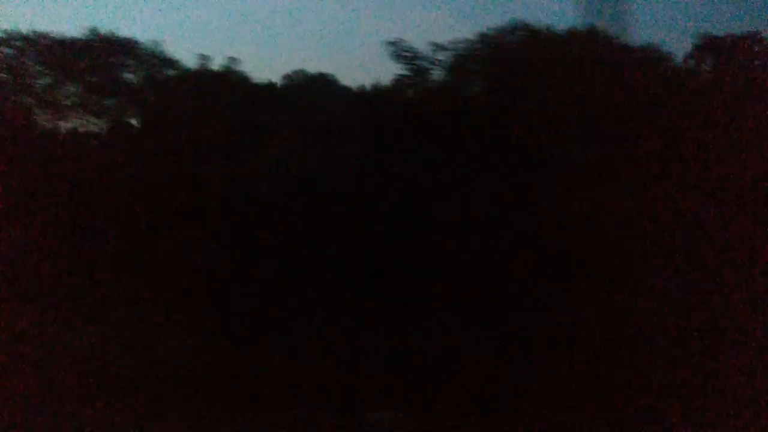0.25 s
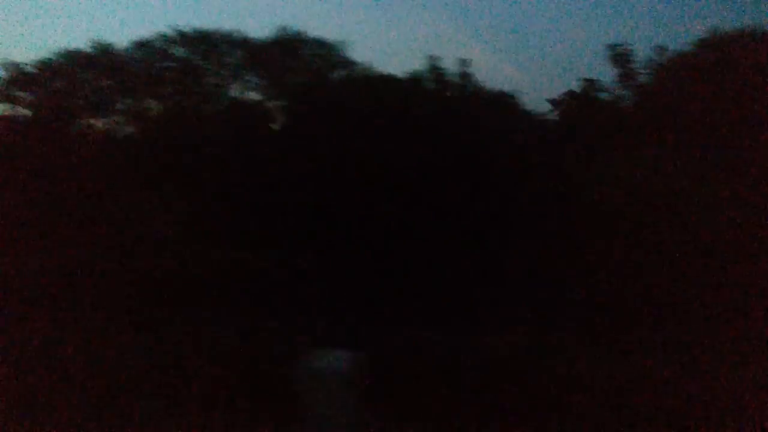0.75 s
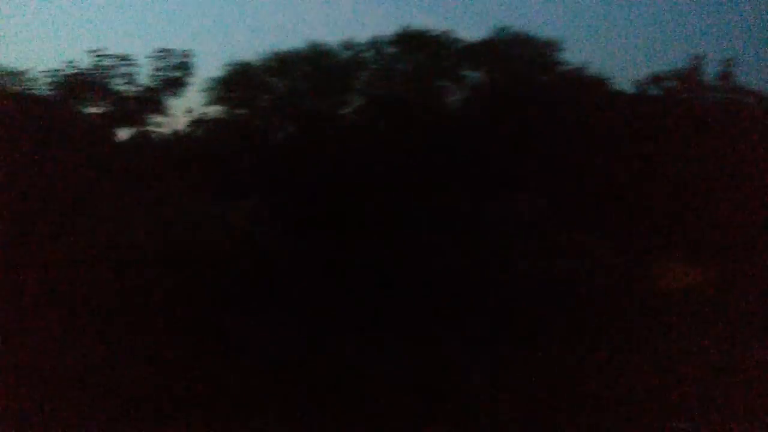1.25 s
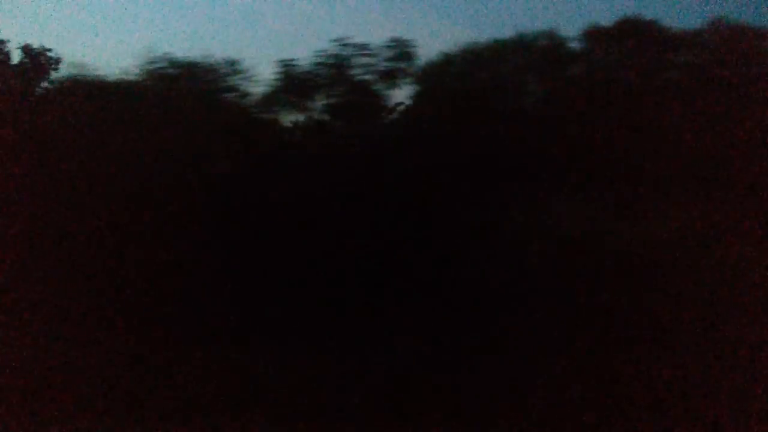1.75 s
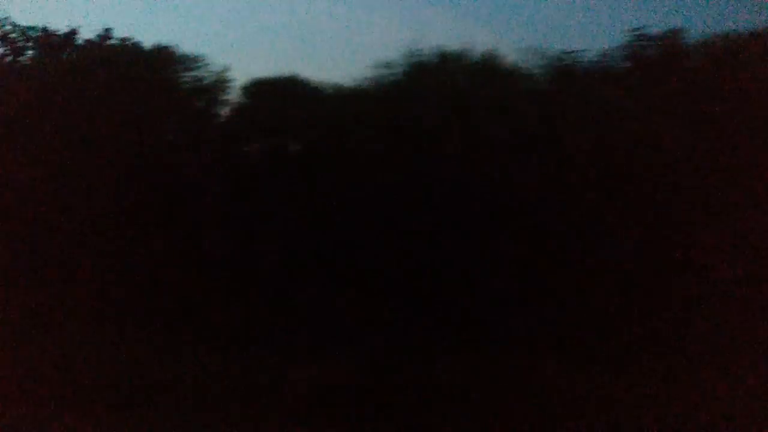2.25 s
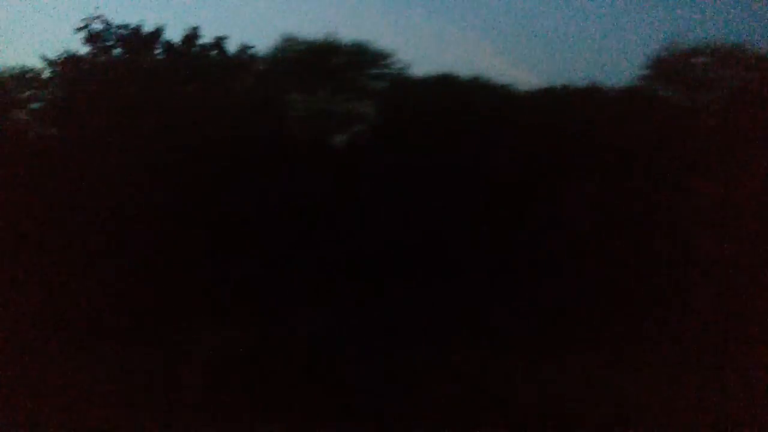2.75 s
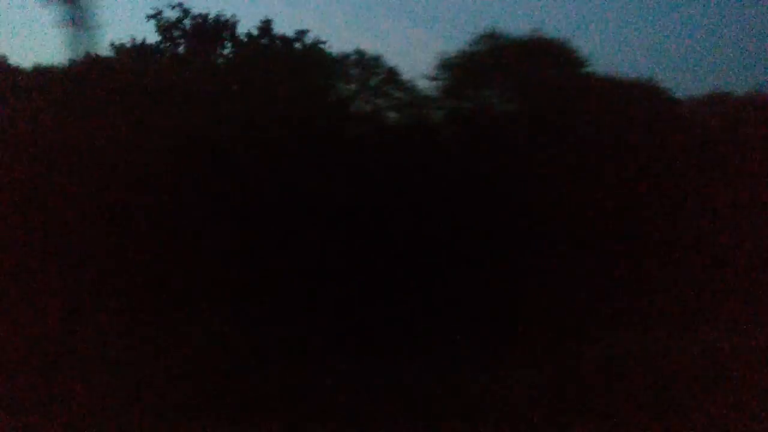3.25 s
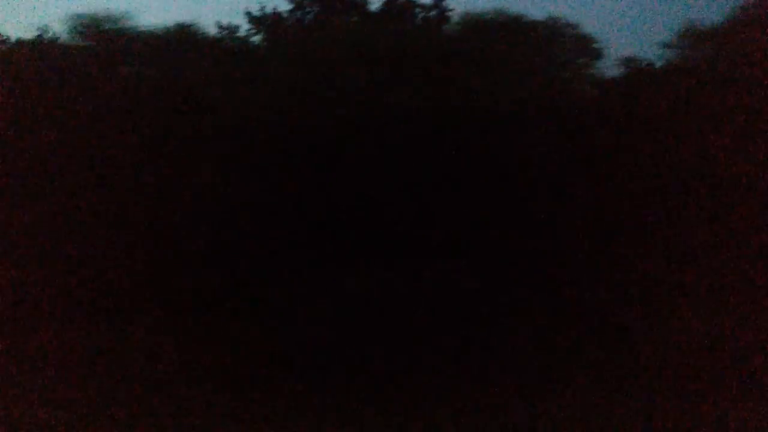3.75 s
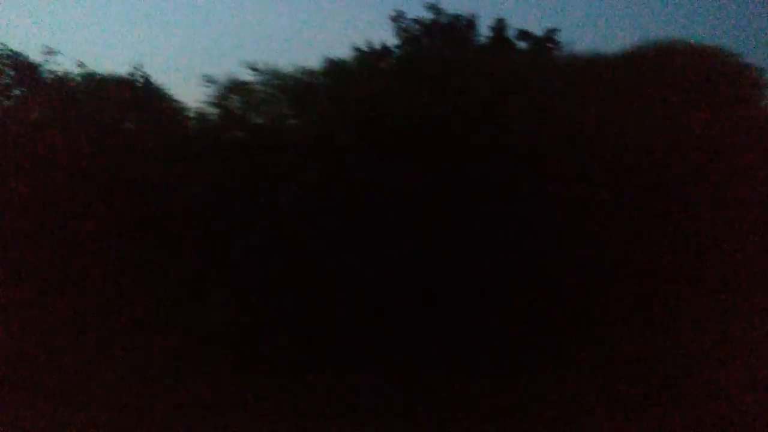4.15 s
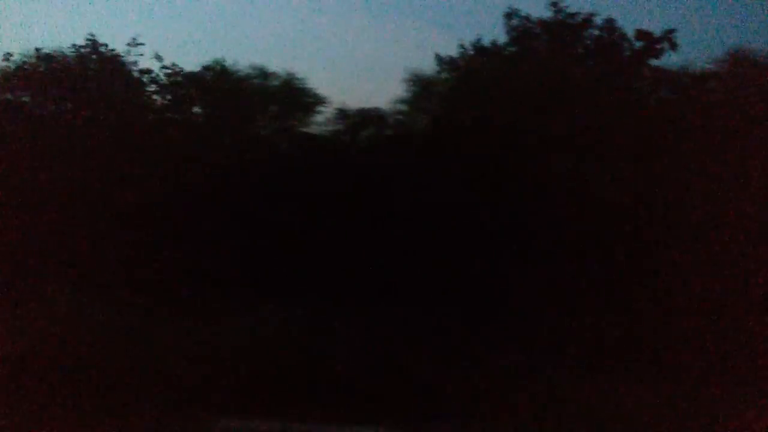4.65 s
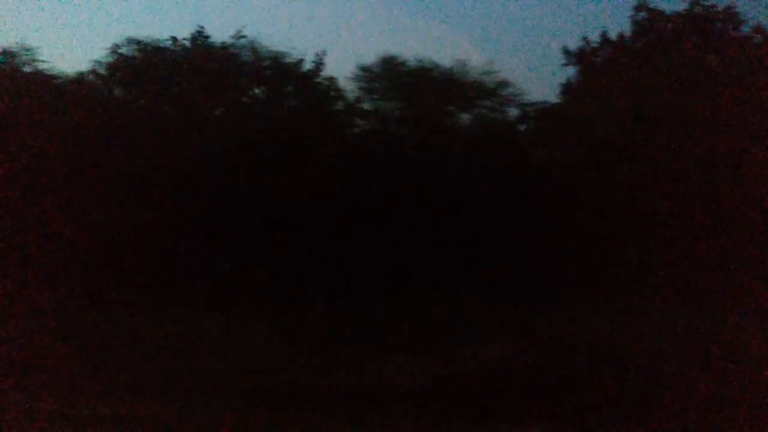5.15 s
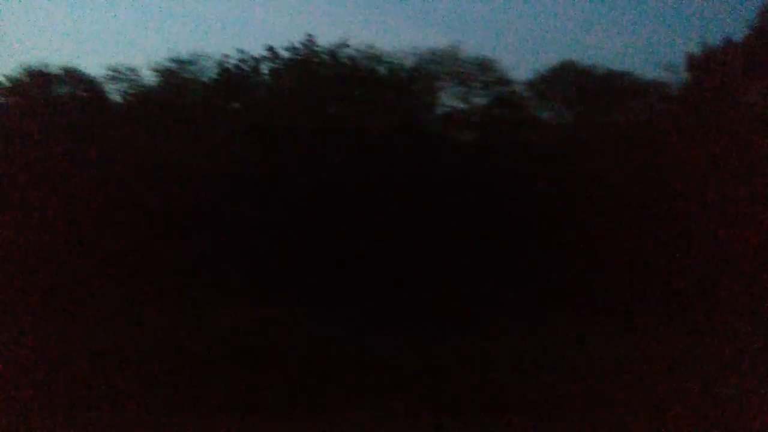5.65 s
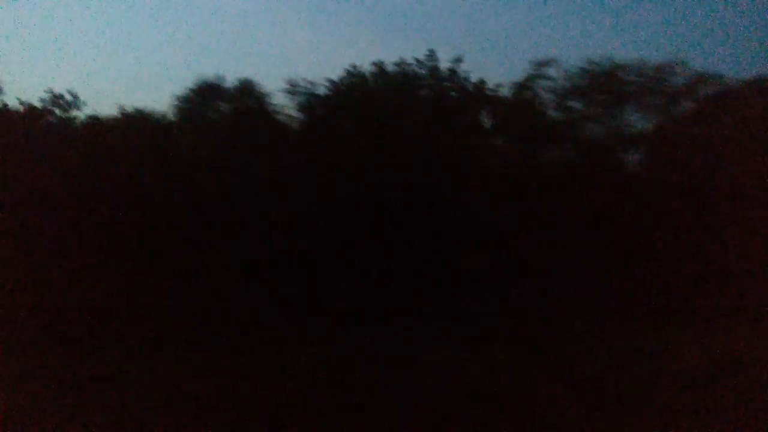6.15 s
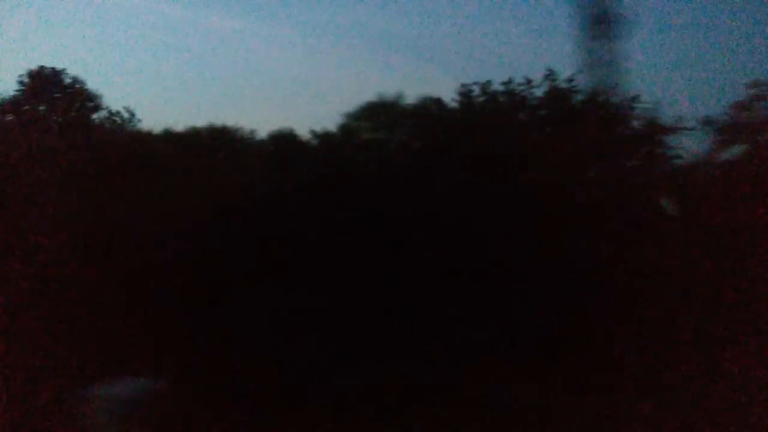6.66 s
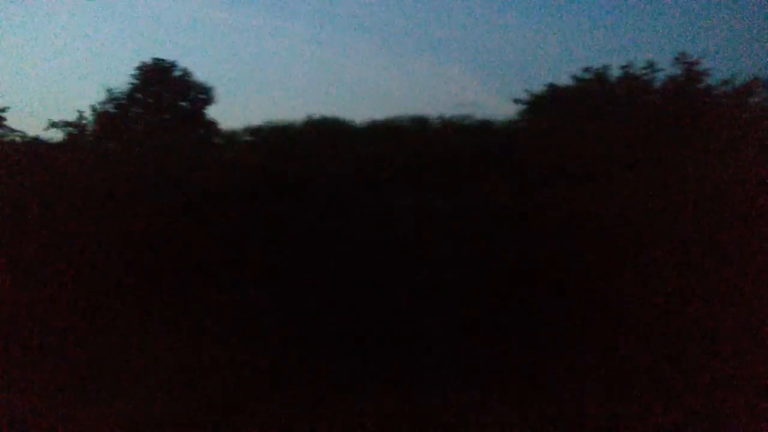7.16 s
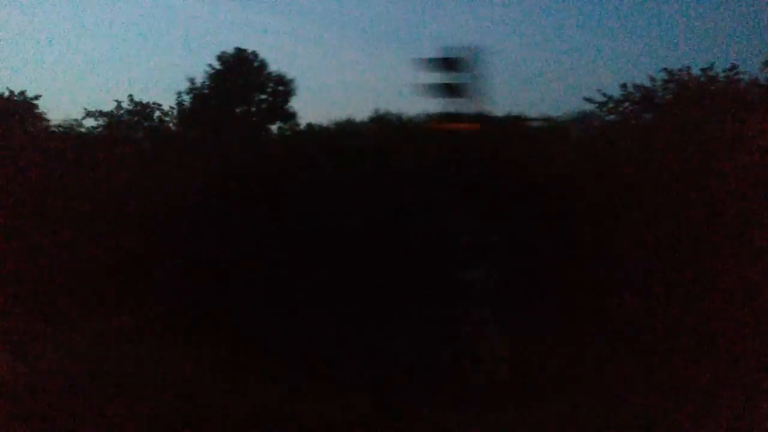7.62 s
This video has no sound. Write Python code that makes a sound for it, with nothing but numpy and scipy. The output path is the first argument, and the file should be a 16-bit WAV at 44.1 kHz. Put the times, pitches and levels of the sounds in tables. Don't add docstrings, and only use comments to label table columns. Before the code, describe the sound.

Inside a train coach at speed, a loud, dense roar is already running at 0 s and continues unchanged to the cut near 7.9 s. It is mostly low and low-mid, a vibrating floor, seats, walls and windows, fluttering with small jolts and brief easings. A softer rail roar and grainy hiss ride on top, with faint wheel ringing, deep sway and very thin high air from a window seal. Irregular clacks and dull knocks punctuate it: lighter ones from 0.2 to 1.2 s, strong clacks at 1.8 and 2.0 s, another cluster around 3.0 to 3.4 s, scattered blows from 3.9 to 5.6 s, and a crisp clack at 6.3 s. Tiny squeals flicker near 2.6, 3.2, 5.5 and 6.3 s. From 7.0 s blows crowd together, hardest at 7.4, 7.6 and 7.8 s. The small mono microphone sounds close and slightly overloaded.

```python
import sys
import numpy as np
from scipy import signal
from scipy.fft import rfft, irfft, next_fast_len
from scipy.io import wavfile
from scipy.ndimage import uniform_filter1d, map_coordinates

SR = 44100
rng = np.random.default_rng(int(sys.argv[2]) if len(sys.argv) > 2 else 0)


def inscribe(sig):
    pcm = np.round(np.clip(np.atleast_2d(sig).T, -1, 1) * 32767)
    wavfile.write(sys.argv[1], SR, pcm.astype(np.int16))


def elevation(decibels):
    levels = np.asarray(decibels, float)
    return 10 ** (levels / 20)


N = 347949

# time_s, rolling_force_db, ripple_db
RIDE = [(0, -10.5, -5), (0.4, -11.5, -4.5), (0.9, -10, -6.5), (1.4, -9.5, -3), (1.9, -11, -3.5),
        (2.35, -11, -5.5), (2.9, -12, -3.5), (3.45, -10.5, -4), (3.9, -10.5, -3.5), (4.3, -10, -6),
        (4.75, -11, -4.5), (5.1, -12.5, -8.5), (5.6, -11, -6.5), (6.0, -12, -9), (6.5, -11, -8),
        (6.9, -10.5, -6), (7.4, -11, -6), (7.89, -11.5, -8)]
# centre_hz, level_over_force_db, follows_force (dB per dB), follows_ripple (dB per dB), flutter_db
BODY_PARTS = [
    (165, -4.5, 0.9, -0.46, 0.53),
    (283, -7.5, 0.87, -0.2, 0.76),
    (420, -5, 0.87, 0.9, 0.24),
    (620, -11, 1.2, 0.054, 0.64),
]
# pitch_hz, width_hz, level_db
FLOOR_MODES = [(101, 26, -16), (112.8, 13, -15), (137.6, 11, -6), (150.7, 29, -8), (165.3, 16, 0.5),
               (185.3, 22, -1.5), (207.6, 24, -5)]
SEAT_MODES = [(237.8, 26, -2), (271.7, 13.4, 0.5), (302.6, 32, -5.5), (327, 19, -9)]
WALL_MODES = [(380, 24.6, 0.5), (411.5, 22, -3), (427, 41, -8), (460.3, 48, -4.5), (488.6, 24, -8)]
WINDOW_MODES = [(543, 34, 0), (581, 49, 1), (650, 40, -5), (673.7, 33, -0.5), (745, 32, -7.5)]
# middle_s,
# change_db, centre_hz, length_s
JOLTS_AND_RESTS = [(0.04, 2, 170, .15), (0.32, 5.5, 600, 0.13), (0.576, 7.5, 335, .16), (0.802, 2.5, 200, .2),
                   (1.05, 1.5, 550, 0.19), (1.21, 4, 200, .2), (1.45, -5, 202, .2), (1.654, 3, 165, 0.33),
                   (1.842, 4.5, 420, .2), (2.04, 7, 165, 0.27), (2.6, 4.5, 420, 0.22), (2.744, -8, 350, 0.14),
                   (3.203, -5, 346, 0.25), (3.33, 6.5, 480, 0.19), (4.07, 2, 554, .2), (4.465, 5.5, 380, 0.24),
                   (5.006, 3.5, 165, .25), (5.187, 6, 190, 0.09), (5.53, -5, 165, 0.18), (5.753, 4, 170, 0.17),
                   (5.805, -8, 620, 0.4), (6.18, 8, 408, 0.14), (6.263, 6.5, 334, 0.11), (6.6, 6, 260, 0.23),
                   (6.916, 3.5, 400, 0.088), (7.0, -9, 165, .15), (7.147, 2.5, 170, .15), (7.332, -3.5, 420, 0.36),
                   (7.525, 3.5, 300, 0.13), (7.697, -6, 165, .15),
                   (0.2, -3, 200, .25), (0.72, -3, 420, .15), (0.95, -4, 190, .15), (1.153, -4, 420, .15),
         (1.828, -3, 170, 0.16), (2.15, -2.5, 620, .2), (2.35, -2.5, 420, 0.27), (3.85, -2, 500, 0.18),
         (4.22, -2.5, 170, .15), (4.46, -5, 640, .15), (5.0, -2.5, 300, .25), (5.9, -2.5, 420, .2),
         (6.42, -2, 300, .2), (7.132, -3, 620, 0.14)]
# time_s, wheel_hiss_db
ROUGHNESS = [(0.0, -20), (0.86, -20), (1.38, -20.5), (1.98, -21), (2.81, -21), (3.16, -20), (3.6, -21),
             (5.8, -19.5), (7.25, -19.5), (7.43, -18), (7.78, -20), (7.89, -18.5)]
# pitch_hz, level_db
RAIL_COLOUR = [(290, -50), (500, -9.5), (522, -2.5), (570, -1), (748, -2.5), (1030, -4), (1380, -13),
               (1720, -20.5), (1900, -16.5), (2200, -21.5), (2860, -21.5), (4840, -120)]
# pitch_hz, level_db
HISS_COLOUR = [(880, -16.5), (1500, -6), (1890, -2.5), (2900, -5), (3400, -1.5), (3950, 0.5), (4600, -3.5),
               (6000, -9), (7100, -16), (8370, -18.5), (9200, -22.5), (9700, -25), (10800, -28.5),
               (13800, -36)]
# middle_s, level_over_fizz_db, length_s
SPRAYS = [(1.198, 5, .1), (1.84, 3, 0.072), (2.603, 2.5, .1), (3.246, 1, 0.12), (3.93, 3, .08),
          (4.278, 7, 0.14), (5.19, 5.5, 0.16), (5.49, 2.5, .08), (6.272, 2, .1), (6.993, 3, 0.14),
          (7.4, 4, .1), (7.513, 6, 0.13)]
# pitch_hz, width_hz, level_db
WHEEL_MODES = [(1912, 120, -10.5), (2478, 22, -9)]
# start_s, peak_db, t60_s (time to fall 60 dB), brightness_db_per_octave
CLACKS = [(0.2394, -12, 0.15, 6), (0.7575, -10, 0.47, 3), (1.0128, -12.5, 0.27, -1.5),
          (1.1986, -9.5, 0.12, 0), (1.8146, -5, 0.55, 0.1), (1.9987, -5, 0.21, -1), (2.0194, -8, 0.14, -1),
          (2.3194, -7, 0.19, -0.9), (2.5908, -13.5, 0.5, 10), (2.788, -12, 0.45, -4),
          (3.1443, -9, 0.3, -0.5), (3.229, -7, 0.45, 2.5), (3.4381, -10.5, 0.36, -10), (3.91, -11, 0.22, 9),
          (4.0694, -8.5, 0.18, 1), (4.27, -15, 0.2, 10), (4.3712, -11.5, 0.3, 8), (4.7196, -9, 0.22, 1.5),
          (5.0484, -10, 0.33, -3), (5.4635, -10, 0.23, -5), (5.5175, -7.5, 0.34, -2),
          (5.6174, -10.5, 0.45, 0), (6.2605, -6.5, 0.21, 5), (6.9614, -8, 0.48, 7.5),
          (7.2602, -7.5, 0.46, -1), (7.3783, -5, 0.26, 1.5), (7.4884, -8, 0.27, 6), (7.6325, -3, 0.39, 2.5),
          (7.7174, -9, 0.3, 10), (7.7977, 0, 0.25, 0.5)]
# start_s, peak_db, brightness_db_per_octave
KNOCKS = [(0.236, -13.5, 2), (0.395, -11, -5), (0.589, -8, -4), (1.040, -6, -3), (1.257, -12, 0),
          (1.679, -12, 5), (1.997, -17, 12), (2.79, -12, 4), (2.989, -6.5, -4), (3.261, -5, 6),
          (4.054, -6, -2.5), (4.371, -12, 5), (4.695, -11.5, 10), (5.001, -14, 7), (5.179, -8.5, -8),
          (5.459, -12, 8), (5.626, -17, 8), (5.788, -17, 6), (5.947, -10.5, -2), (6.439, -12.5, 6),
          (6.548, -9.5, -4), (6.879, -11.5, 10), (7.03, -11, 3), (7.385, -12, -2), (7.494, -5.5, -2),
          (7.637, -17, 9), (7.8, -19, 9)]
# start_s, pitch_hz, width_hz,
# level_db, length_s
SQUEALS = [(0.76, 1890, 90, -31, 0.31), (2.575, 6170, 200, -24, 0.04), (2.582, 5400, 500, -34, 0.046),
           (2.7, 1870, 80, -36, 0.51), (2.922, 2450, 45, -38, 0.32), (3.231, 5800, 900, -24, .07),
           (3.233, 4000, 200, -26, 0.041), (3.35, 2460, 30, -33, 0.2), (5.432, 4120, 300, -21.5, 0.091),
           (5.59, 4000, 250, -22.5, .09), (6.3, 5750, 500, -26, 0.061), (7.636, 4700, 1500, -21, .05),
           (7.798, 4900, 1510, -21, 0.048)]
# pitch_hz, width_hz, level_db
SWAY_MODES = [(58, 12, -1), (80, 52, 8)]
# pitch_hz, width_hz, level_db
LEAK_MODES = [(10500, 900, -4), (11500, 700, -1.5), (12200, 900, 0), (12800, 900, -.5)]
# middle_s, level_over_calm_db, length_s
GUSTS = [(0.4, 2, .8), (1.8, 3, .4), (2.5, 3.3, 1), (3.15, 3, .7), (3.75, 3, .5), (4.3, 3.3, .8),
         (4.85, -2, .6), (5.3, 3.3, .5), (5.75, 4.3, .8), (6.2, 4.5, .6), (6.6, 4.3, .5), (7.1, 4, .8)]


def unit(x):
    return x / np.sqrt(np.mean(x ** 2) + 1e-20)


def curves(rows):
    time_s, *columns = np.transpose(rows)
    return [np.interp(np.arange(N) / SR, time_s, column) for column in columns]


def wobble(rate):
    return map_coordinates(rng.standard_normal(int(N * rate / SR) + 4), [np.arange(N) * rate / SR])


def bump(middle_s, length_s):
    t = np.arange(0, N / SR + .002, .001)
    return np.cos(np.pi * np.clip((t - middle_s) / max(length_s, .03), -.5, .5)) ** 2


def per_sample(ms):
    return np.interp(np.arange(N) / SR, np.arange(len(ms)) / 1000, ms)


def humps(rows):
    return per_sample(sum(db * bump(middle_s, length_s) for middle_s, db, length_s in rows))


def shape(points):
    f, db = np.transpose(points)
    return lambda hz: elevation(np.interp(np.log(hz + 1), np.log(f + 1), db))


def modes(rows, steep):
    return lambda hz: np.sqrt(sum(elevation(2 * db) / (1 + (2 * (hz - c) / w) ** 2) ** steep for c, w, db in rows))


def rush(gain, patchy_db=0):
    z = signal.stft(rng.standard_normal(N + 8192), nperseg=512)[2]
    patches = uniform_filter1d(uniform_filter1d(rng.standard_normal(z.shape), 8, 0), 10, 1)
    x = signal.istft(z * elevation(patchy_db * unit(patches)), nperseg=512)[1]
    m = next_fast_len(len(x))
    return unit(irfft(rfft(x, m) * gain(np.fft.rfftfreq(m, 1 / SR)), m)[:N])


def ripple():
    ripple_db = curves(RIDE)[1]
    return ripple_db - ripple_db.mean()


def coach_body():
    force_db, ripple_db = curves(RIDE)[0], ripple()
    mean_db = force_db.mean()
    shakes = JOLTS_AND_RESTS
    shake_db = np.array([db * bump(s, length_s) for s, db, _, length_s in shakes])
    shake_hz = np.transpose(shakes)[2]
    flutter_per_s, reach_octaves = 7, 0.45
    shared_db = 0.71 * wobble(flutter_per_s)
    body = 0
    part_modes = (FLOOR_MODES, SEAT_MODES, WALL_MODES, WINDOW_MODES)
    for (part_hz, db, force, waves, flutter_db), rows in zip(BODY_PARTS, part_modes):
        near = np.exp(-(np.log2(shake_hz / part_hz) / reach_octaves) ** 2)
        level_db = mean_db + db + force * (force_db - mean_db) + waves * ripple_db
        level_db = level_db + per_sample(near @ shake_db) + shared_db + flutter_db * wobble(flutter_per_s)
        body = body + elevation(level_db) * rush(modes(rows, steep=1.74), patchy_db=0.2)
    return body


def track():
    rough_db, = curves(ROUGHNESS)
    rough_db = rough_db - rough_db.mean()
    roar_db = -23.5 + 0.66 * rough_db + 0.15 * ripple()
    hiss_db = -21 + rough_db
    fizz_db = -39.5 + 1.1 * rough_db + humps(SPRAYS) + 0.47 * wobble(8)
    bumps = wobble(11)

    colour = shape(HISS_COLOUR)
    upper = lambda hz: 1 / (1 + (7000 / (hz + 1)) ** 12)
    roar = elevation(roar_db + 2 + .7 * bumps) * rush(shape(RAIL_COLOUR), patchy_db=1.17)
    hiss = elevation(hiss_db + .4 * bumps) * rush(lambda hz: colour(hz) * np.sqrt(1 - upper(hz)), patchy_db=1.0)
    fizz = elevation(fizz_db) * rush(lambda hz: colour(hz) * np.sqrt(upper(hz)), patchy_db=0.6)
    ring_db = hiss_db - 11.5 + 2.2 * wobble(3.3)
    ring = elevation(ring_db) * rush(modes(WHEEL_MODES, steep=1.3), patchy_db=2.5)
    return roar + hiss + fizz + ring


def joints(rows, gain, rise_s, centre_hz, offset_db):
    out, t = np.zeros(N + SR), np.arange(SR // 2) / SR
    hz = np.fft.rfftfreq(len(t), 1 / SR)
    octaves = np.clip(np.log2((hz + 1) / centre_hz), -1, .7)
    for start_s, db, t60_s, tilt_db in rows:
        colour = gain(hz) * elevation(np.clip(tilt_db, -9, 12) * octaves)
        burst = unit(irfft(rfft(rng.standard_normal(len(t))) * colour, len(t)))
        rise = 1 - np.exp(-t / max(rise_s, .001))
        first_blow = 0.4 * elevation(-60 * t / 0.025)
        swell = rise * (elevation(-60 * t / max(t60_s, .03)) + first_blow)
        out[round(start_s * SR):][:len(t)] += elevation(db + offset_db) * burst * swell
    return out[:N]


def clacks():
    dulled = lambda hz: shape(HISS_COLOUR)(hz) / (1 + (hz / 8800) ** 6)
    return joints(CLACKS, dulled, rise_s=0.003, centre_hz=4000, offset_db=-10.0)


def knocks():
    rows = [(start_s, db, 0.2, tilt_db) for start_s, db, tilt_db in KNOCKS]
    return joints(rows, shape(RAIL_COLOUR), rise_s=0.002, centre_hz=1030, offset_db=-4.5)


def squeals():
    out, t = np.zeros(N + SR), np.arange(SR // 2) / SR
    hz = np.fft.rfftfreq(len(t), 1 / SR)
    for start_s, pitch_hz, width_hz, db, length_s in SQUEALS:
        colour = modes([(pitch_hz, width_hz, 0)], steep=2)(hz)
        tone = unit(irfft(rfft(rng.standard_normal(len(t))) * colour, len(t)))
        swell = np.sin(np.pi * np.minimum(t / length_s, 1))
        out[round(start_s * SR):][:len(t)] += elevation(db) * tone * swell
    return out[:N]


def bogie_sway():
    return elevation(-40.5) * rush(modes(SWAY_MODES, steep=1.4))


def air_leak():
    return elevation(-52.6 + humps(GUSTS)) * rush(modes(LEAK_MODES, steep=2.7), patchy_db=2.2)


def scene():
    return (coach_body() + track() + clacks() + knocks() + squeals() + bogie_sway() + air_leak())[None]


def top_cut(x):
    return signal.sosfilt(signal.butter(12, 13490, fs=SR, output="sos"), x)


def record(dry):
    top, hardness = 1.1, 7
    soft = dry[0] / (1 + np.abs(dry[0] / top) ** hardness) ** (1 / hardness)
    mix = signal.sosfilt(signal.butter(2, 42, "high", fs=SR, output="sos"), soft)
    return top_cut(mix[None])


dry = scene()
out = record(dry)
inscribe(out)
```